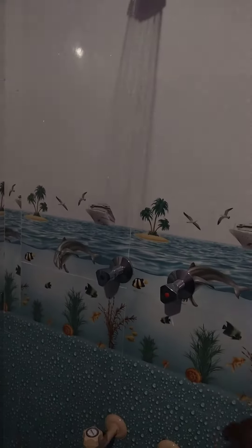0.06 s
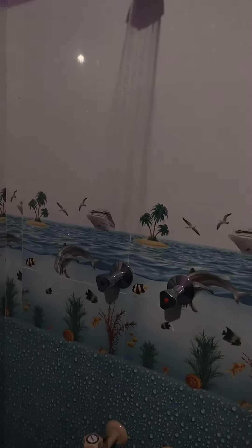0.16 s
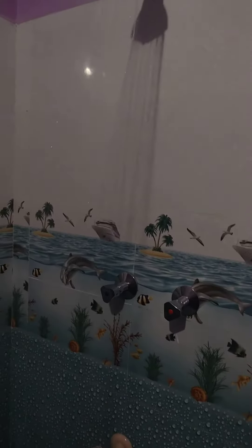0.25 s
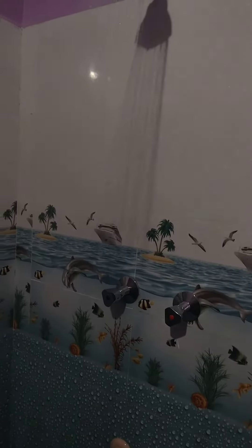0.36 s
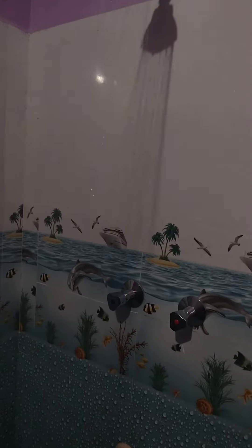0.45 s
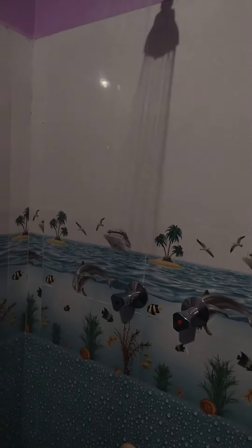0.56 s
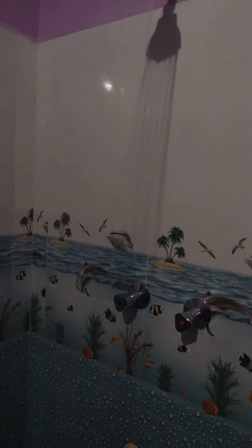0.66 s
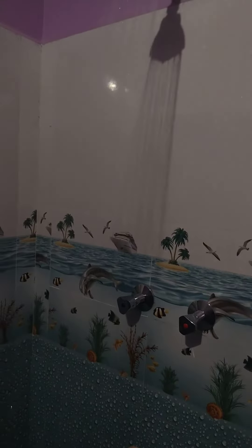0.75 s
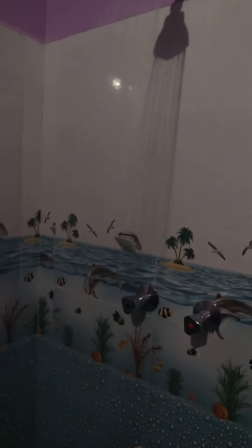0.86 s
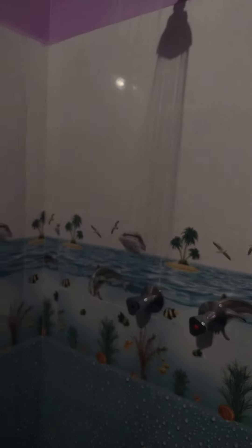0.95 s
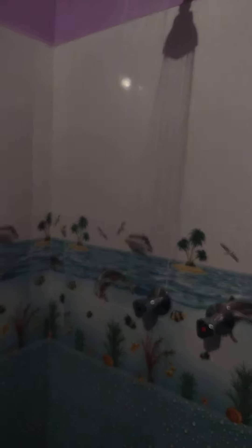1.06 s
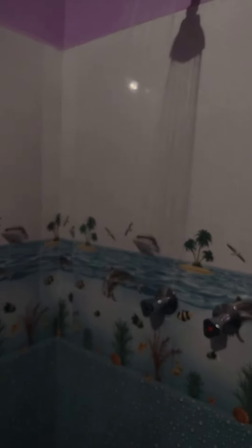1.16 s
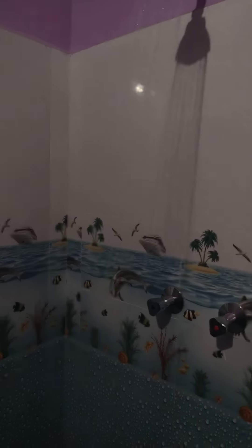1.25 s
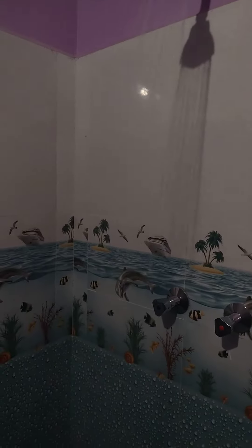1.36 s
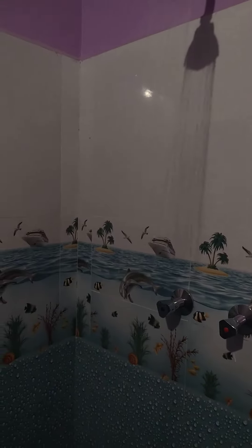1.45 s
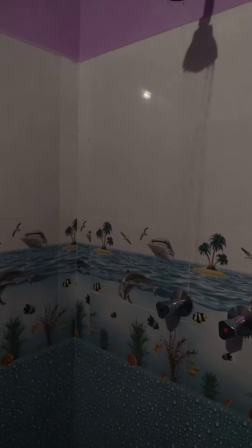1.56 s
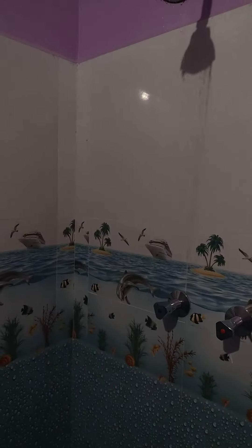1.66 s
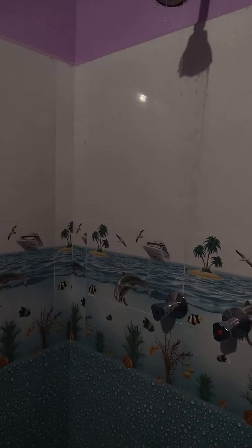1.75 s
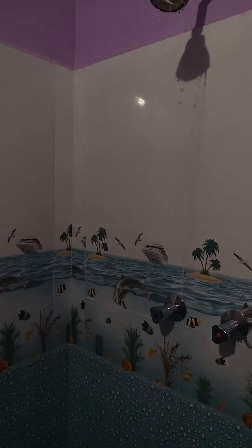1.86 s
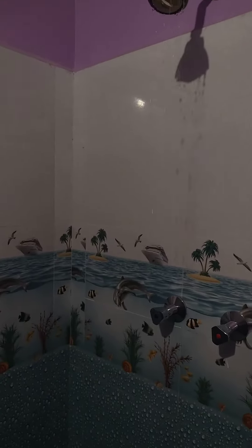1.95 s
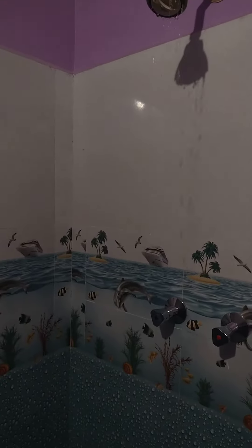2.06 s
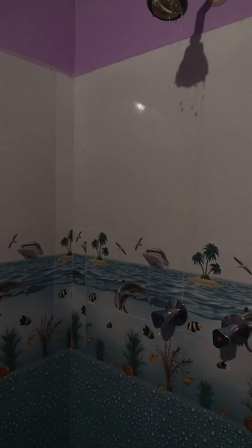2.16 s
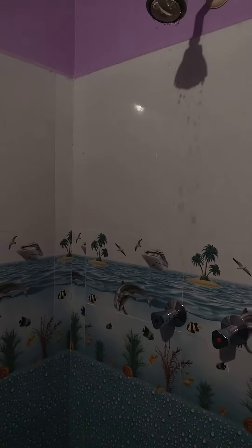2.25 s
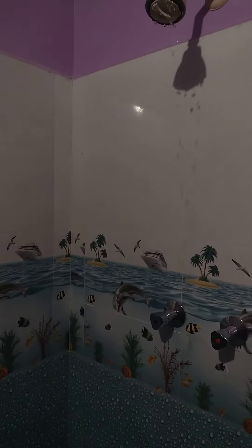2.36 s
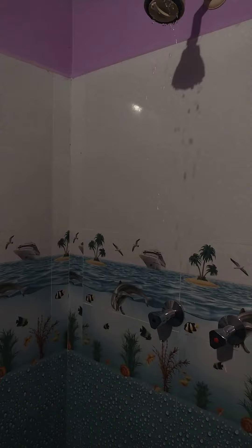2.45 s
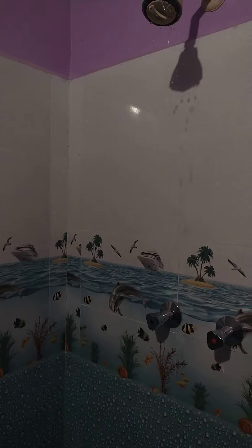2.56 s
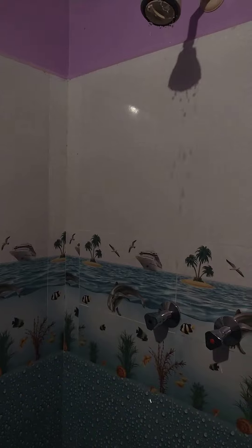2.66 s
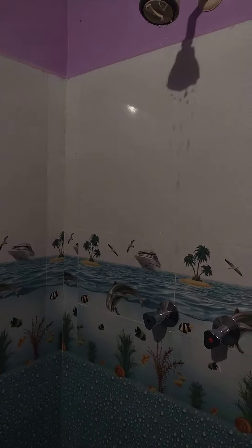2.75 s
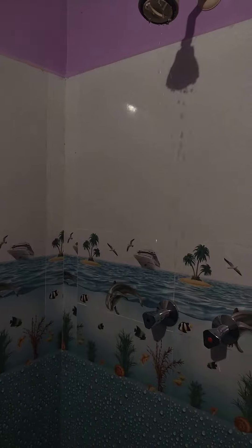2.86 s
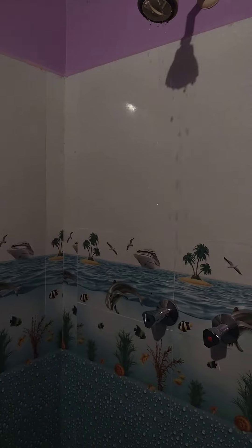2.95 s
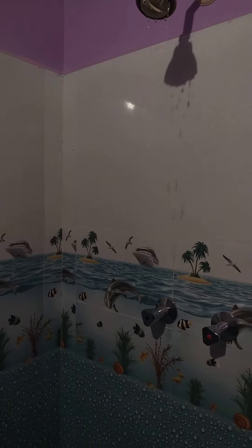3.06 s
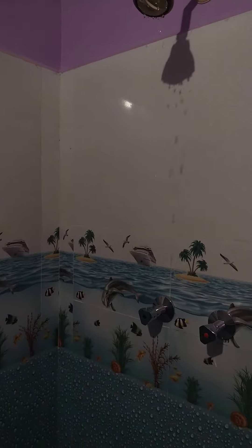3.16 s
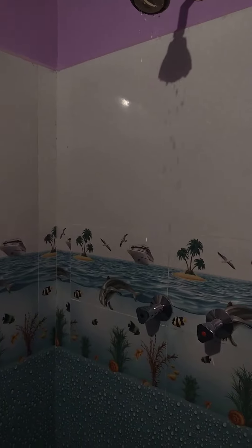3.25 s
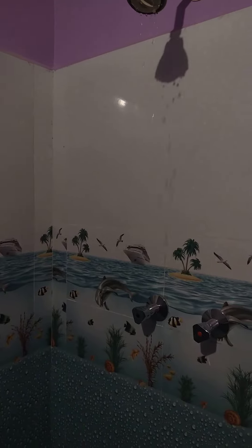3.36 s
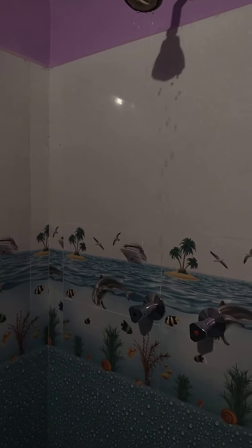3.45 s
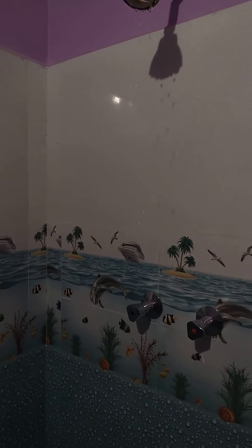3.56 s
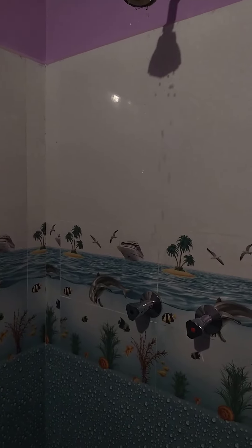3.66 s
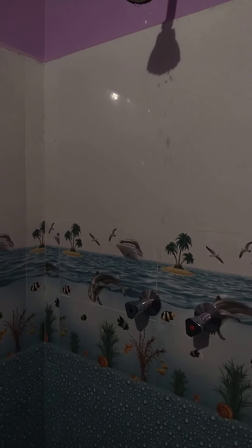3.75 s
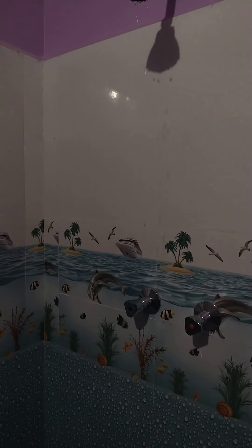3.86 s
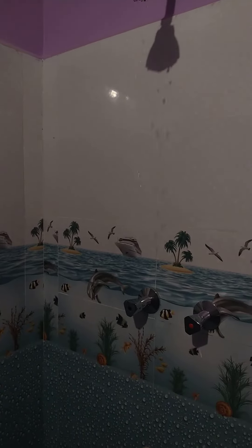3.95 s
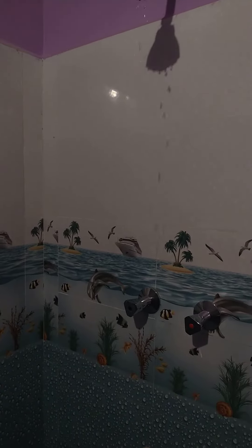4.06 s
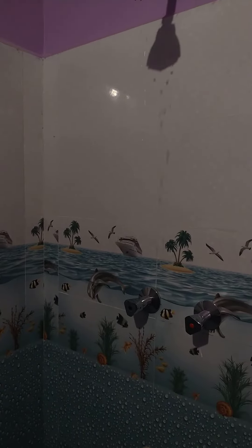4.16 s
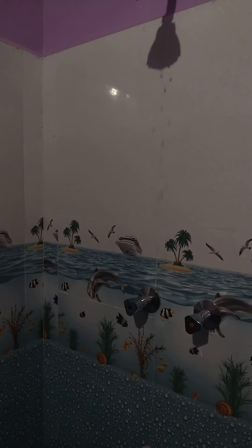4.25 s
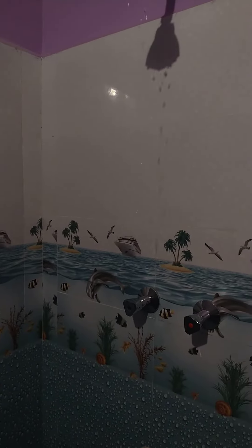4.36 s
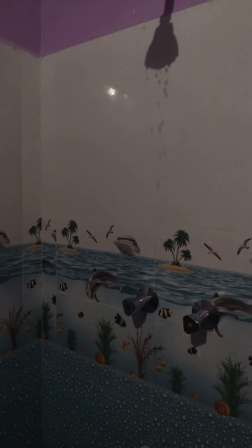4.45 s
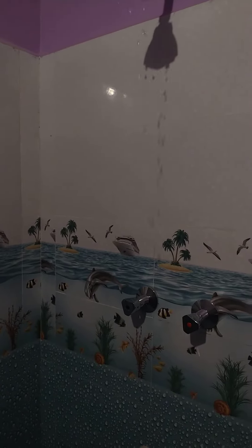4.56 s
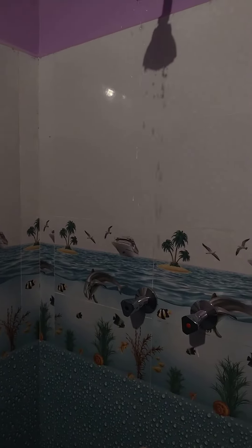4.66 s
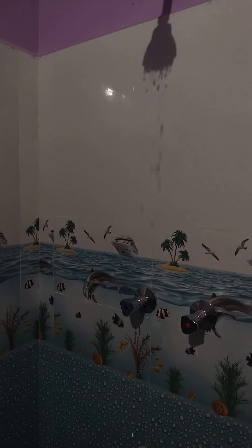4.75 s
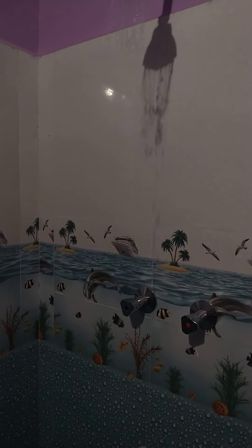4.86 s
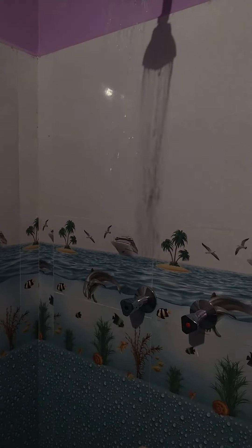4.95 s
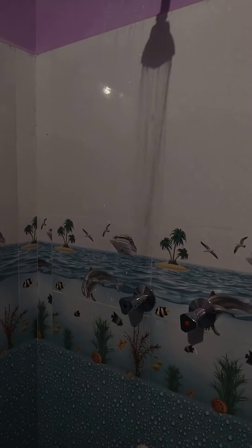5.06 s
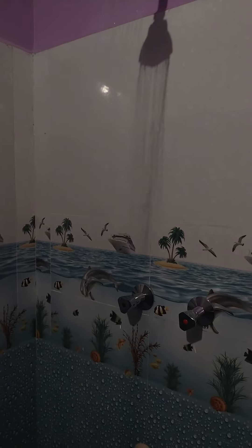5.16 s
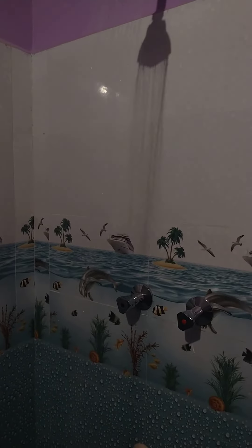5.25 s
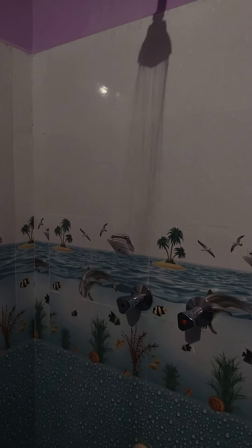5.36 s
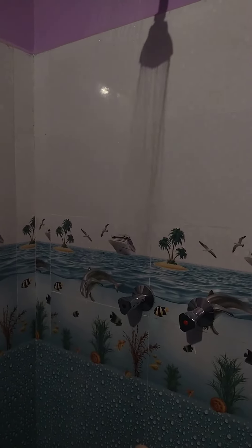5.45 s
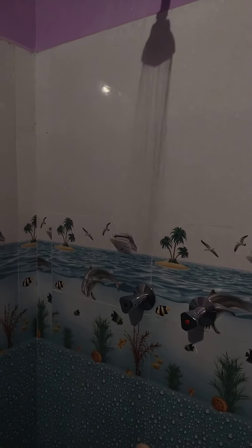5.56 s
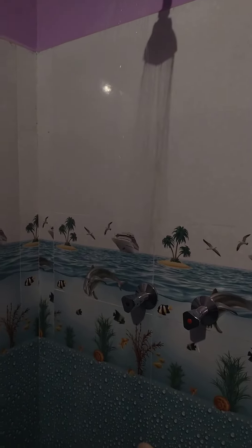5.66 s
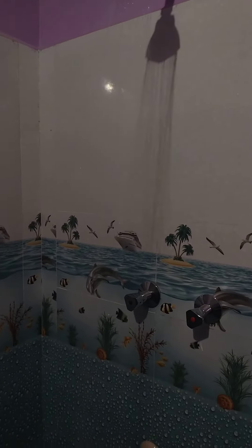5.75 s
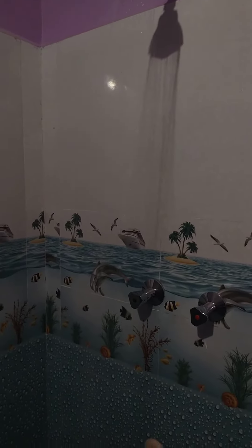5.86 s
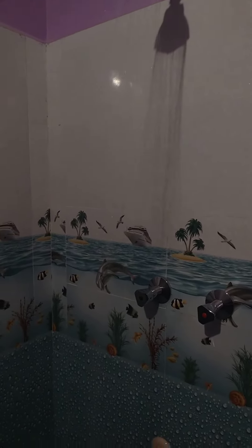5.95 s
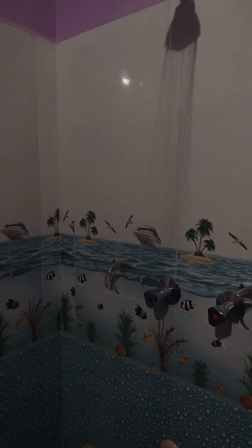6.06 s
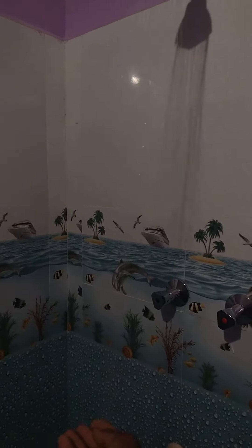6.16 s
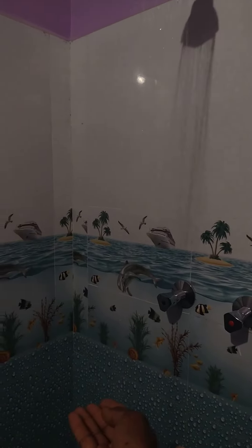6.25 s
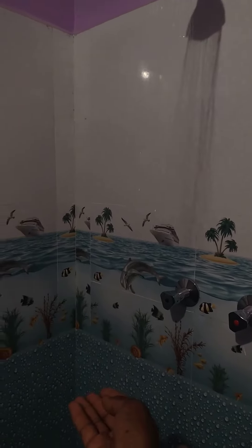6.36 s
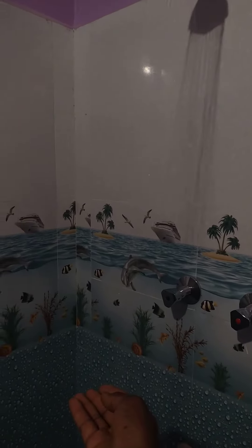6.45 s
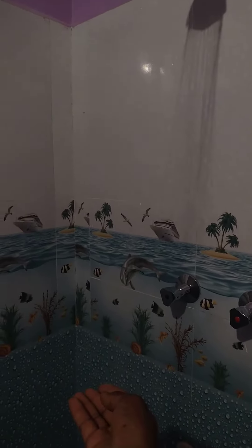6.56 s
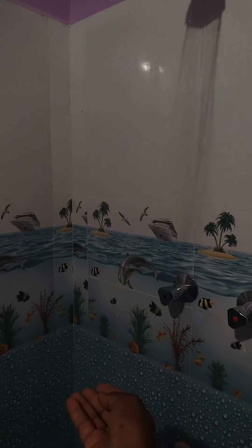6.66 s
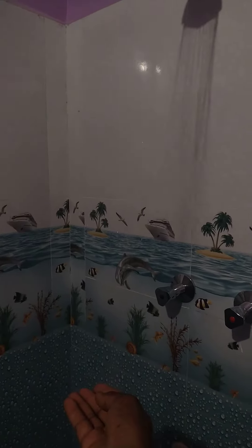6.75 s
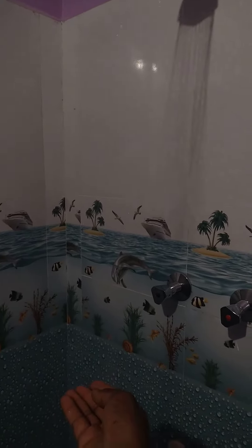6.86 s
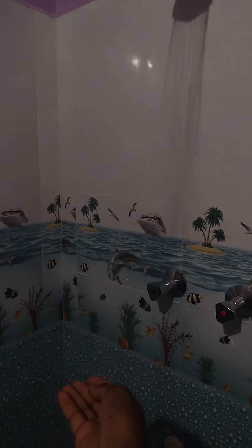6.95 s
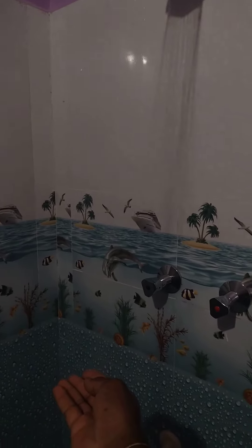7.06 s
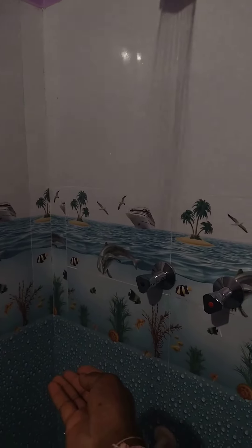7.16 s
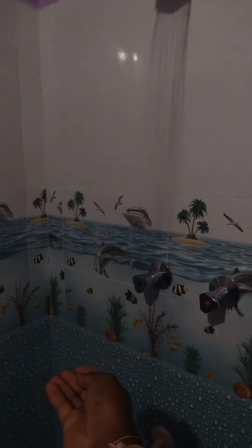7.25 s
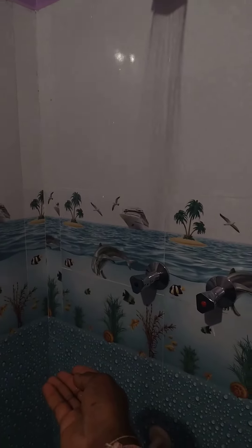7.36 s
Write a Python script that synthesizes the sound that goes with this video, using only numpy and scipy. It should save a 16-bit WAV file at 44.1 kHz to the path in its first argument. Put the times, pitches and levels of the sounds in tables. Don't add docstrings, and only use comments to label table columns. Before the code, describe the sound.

A bright shower hisses and spatters in a hard tiled bathroom, cuts off to scattered sharp splatting drops, then bursts back into steady spray.

```python
import sys
import numpy as np
from scipy import signal
from scipy.fft import rfft, irfft, next_fast_len
from scipy.io import wavfile
from scipy.ndimage import uniform_filter1d

SR = 44100
rng = np.random.default_rng(int(sys.argv[2]) if len(sys.argv) > 2 else 0)


def linear_from_db(decibels):
    return 10 ** (np.asarray(decibels, float) / 20)


def master_out(mix):
    frames = np.transpose(np.atleast_2d(mix))
    ceiling = np.clip(frames, -1, 1)
    pcm = np.round(ceiling * 32767).astype(np.int16)
    wavfile.write(sys.argv[1], SR, pcm)


N = 325899


def level(x, db):
    return x * linear_from_db(db) / np.sqrt(np.mean(x ** 2))


def colour(x, hz, db):
    size = next_fast_len(len(x))
    f = np.log(np.fft.rfftfreq(size, 1 / SR) + 1)
    gain = linear_from_db(np.interp(f, np.log(hz), db, left=-70))
    return irfft(rfft(x, size) * gain, size)[:len(x)]


def curve(table):
    s, *columns = np.transpose(table)
    return [np.interp(np.arange(N) / SR, s, c) for c in columns]


def walk(rate):
    k = int(SR / rate)
    held = np.repeat(rng.standard_normal(N // k + 1), k)
    return 1.5 * uniform_filter1d(held, k)[:N]


def band(x, hz, width):
    return signal.lfilter(*signal.iirpeak(hz, hz / width, SR), x)


# (time [s], fine spray level [dB], coarseness [dB])
FLOW = [(0, -28, 8.5), (0.14, -28.5, -0.5), (0.5, -33, -2), (1.27, -34.5, -0.5), (1.48, -33, -6),
        (1.93, -34.5, -1.5), (2.14, -55.5, 2), (2.4, -50.5, 4), (2.84, -44.5, 12), (3.3, -52, 7.5),
        (4.0, -51, 9.5), (4.2, -54.5, 16), (4.9, -53.5, 10), (5.3, -49, 9.5), (5.54, -29, -0.5),
        (5.75, -32.5, -3), (6.2, -34, -0.5), (7.39, -36, -1)]
MID_DB, LOW_DB = -17.5, -17.5
LOW_SHARE = 0.9


def spray(per_s=2500, scatter_db=4.0, clump_db=1.1, own_db=1.27):
    out, clumping = 0, walk(14)
    top_db, coarse_db = curve(FLOW)
    mid_db = top_db + MID_DB + coarse_db
    low_db = top_db + LOW_DB + LOW_SHARE * coarse_db
    shapes = [([5470, 8000, 10030, 17600], [-18.0, -3.0, -1.5, -7.5], top_db),
              ([4270, 5140, 7340, 9300], [-9, -0.5, -2.5, -12], mid_db),
              ([1480, 3240, 5300, 6060], [-30.5, -2.5, -1.5, -8], low_db)]
    for hz, shape_db, db in shapes:
        landed = rng.random(N) < per_s / SR
        size = linear_from_db(scatter_db * rng.uniform(-1.1, 1.3, size=N))
        hits = landed * rng.standard_normal(N) * size
        swell = linear_from_db(db + clump_db * clumping + own_db * walk(20))
        out = out + level(colour(hits, hz, shape_db), 0) * swell
    return out


def splats(table, early_s, splash_s, splash_db, gain_db, skirt_db=-22, bass_db_oct=1.5, treble_db_oct=1.5):
    out, t = np.zeros(N + 8192), np.arange(-256, 3840) / SR
    octaves = np.arange(-2.2, 1.1, .1)
    noise = rng.standard_normal((len(table), len(t))) * (t > 0) * np.exp(-np.abs(t) / splash_s)
    for (s, peak_db, bright, spread), splash in zip(table, noise):
        away = octaves - bright
        hump_db = -6 * (away / max(spread, .1)) ** 2
        thinning_db = np.abs(away) * np.where(away < 0, bass_db_oct, treble_db_oct)
        shape_db = np.maximum(hump_db, skirt_db - thinning_db)
        crack = t == 0
        splat = colour(crack + linear_from_db(splash_db) * splash, 8000 * 2 ** octaves, shape_db)
        k = max(int((s - early_s + t[0]) * SR), 0)
        out[k:k + len(t)] += splat * linear_from_db(peak_db + gain_db) / np.sqrt(np.sum(splat ** 2))
    return out[:N]


# (time [s], peak level [dB], brightness about the middle colour [octaves], spread [octaves])
DROPS = [(2.325, -31, .4, 0.86), (2.359, -23, 0.44, 0.48), (2.4416, -17, -0.24, 0.51),
         (2.489, -12.5, 0.51, 1), (2.6585, -13.5, -0.3, 0.53), (2.7454, -30, .2, .9),
         (2.7761, -12, 0.24, 0.82), (2.8739, -11, -0.14, 0.51), (2.9437, -16.5, 0.17, .5),
         (3.0685, -20.5, -.2, 0.88), (3.1832, -20, 0.25, 0.4), (3.2476, -23, 0.43, 0.89),
         (3.3577, -24, 0.13, 0.63), (3.4744, -31, 0.14, .5), (3.5386, -12, 0.12, 0.43),
         (3.6626, -16.5, -0.024, 1.05), (3.8563, -16.5, -0.029, 0.45), (3.9626, -16.5, 0.0033, .35),
         (3.9859, -12.5, -0.4, 0.55), (4.011, -15, 0.065, 0.49), (4.321, -25, 0.45, .6),
         (4.339, -9, -0.039, 0.37), (4.378, -7.5, -0.41, 0.56), (4.621, -27, 0.2, .8),
         (4.863, -30.5, -0.045, 0.25), (4.98, -31, 0.67, 0.54), (5.058, -29.5, 0.22, 0.45),
         (5.4483, -11.5, -0.099, 0.93), (5.625, -10.5, -0.095, 0.72)]
MAIN_ECHO_S = .0098


def fat_drops():
    return splats(DROPS, MAIN_ECHO_S, splash_s=0.0021, splash_db=-20, gain_db=6.5)


# (time [s], peak level [dB], brightness [octaves], spread [octaves])
CLUMPS = [(0.0584, -14, 0.65, 1), (0.267, -17, .45, 0.84), (0.449, -20, 0.63, 0.42),
          (0.559, -15, 0.78, 0.74), (0.6393, -17.5, 0.49, 0.75), (0.8001, -13, 0.27, 0.52),
          (0.9007, -19, 0.52, 0.75), (1.1072, -17.5, 0.52, 0.67), (1.2188, -21, 0.37, 0.64),
          (1.4556, -24.5, -0.24, 0.59), (1.6534, -21, 0.37, .7), (1.7984, -16.5, 0.59, 0.74),
          (2.042, -26, .5, 0.5), (5.1565, -24.5, 0.3, 0.46), (5.349, -12.5, 0.22, 0.85),
          (5.471, -17, -0.18, 0.61), (5.6593, -17, .33, 0.7), (5.7794, -22, 0.46, 0.56),
          (5.913, -14.5, 0.39, 0.53), (5.9944, -13, 0.35, 0.69), (6.188, -25, .35, .6),
          (6.331, -18.5, 0.12, 0.47), (6.429, -17.5, 0.17, 0.6), (6.532, -17, 0.47, .6),
          (6.6754, -20, 0.29, 0.4), (6.7684, -16.5, 0.26, 0.43), (6.8361, -15.5, 0.1, 0.51),
          (6.9052, -14.5, 0.38, 0.77), (7.0642, -21.5, 0.27, 0.36), (7.3518, -19, 0.37, .65)]


def spray_clumps():
    return splats(CLUMPS, .001, splash_s=0.012, splash_db=-7, gain_db=10.0)


# (time [s], peak level [dB], brightness [octaves], spread [octaves])
DRIBBLES = [(2.5, -25.5, 0.62, 0.58), (2.8, -27.5, -0.0095, .7), (3.085, -24, 0.38, .9),
            (3.6, -31.5, 0.12, 1.1), (3.69, -36, .4, 0.64), (3.97, -29, .7, 0.67),
            (4.025, -24.5, -0.18, 0.75), (4.33, -32, 0.87, 0.45), (4.385, -23, -0.26, 0.32),
            (5.17, -39, 0.11, 1.2), (5.55, -28, -0.46, 0.42)]


def dribbles():
    return splats(DRIBBLES, .001, splash_s=0.0073, splash_db=15, gain_db=17.5)


# (frequency [Hz], width [Hz], level [dB])
KNOCK = [(915, 260, 4), (1580, 150, 3), (2950, 220, -0.5), (3960, 430, 0.5)]
KNOCK_S, KNOCK_DB = 1.450, -34


def knock(rise_s=.006, fall_s=0.033):
    t = np.clip(np.arange(N) / SR - KNOCK_S, 0, None)
    scrape = rng.standard_normal(N) * (1 - np.exp(-t / rise_s)) * np.exp(-t / fall_s)
    ring = sum(linear_from_db(db) * band(band(scrape, hz, 2 * width), hz, width) for hz, width, db in KNOCK)
    return linear_from_db(KNOCK_DB) * ring


# (delay [ms], level [dB])
ECHOES = [(0, -7), (2, -6), (7.5, -9), (10.3, 0.5), (12.4, -2), (18.2, -6), (21.3, -9), (28.6, -5)]
# (frequency [Hz], time [s])
T60 = [(500, 0.59), (2000, 1), (4000, 0.74), (7000, 0.61), (11000, 0.63), (16000, 0.49)]


def room(tail_db=-25, build_s=0.0062, blur_s=0.00027):
    t = np.arange(SR) / SR
    f, s, z = signal.stft(rng.standard_normal(SR), SR, nperseg=128)
    t60 = np.interp(f, *np.transpose(T60))
    tail = signal.istft(z * linear_from_db(-60 * s / t60[:, None]), SR)[1][:SR]
    response = linear_from_db(tail_db) * tail * (1 - np.exp(-t / build_s))
    for ms, db in ECHOES:
        blur = rng.standard_normal(128) * np.exp(-t[:128] / blur_s)
        blur[0] = 1.54
        k = int(ms * SR / 1000)
        response[k:k + 128] += linear_from_db(db) * blur / np.sqrt(np.sum(blur ** 2))
    return response


def reflect(x, turn):
    before = SR // 2

    def ring(v):
        already_ringing = np.concatenate([v[before:0:-1], v])
        return signal.fftconvolve(already_ringing, room())[before:before + N]

    return ring(x * np.cos(turn)) + ring(x * np.sin(turn))


# (time [s], level [dB], held [s])
SURGES = [
    (0, -43, 0.3),
    (1.45, -41, 0.096),
    (2.47, -49.5, .02),
    (2.76, -54, 2.4),
    (5.32, -50.5, 0.04),
    (5.46, -48, 0.027),
    (6.01, -57, 0.025),
]


def surges(rise_s=0.01, fall_db_s=57.5):
    t = np.arange(N) / SR
    total = 0
    for s, db, held in SURGES:
        swell = np.clip((t - s) / rise_s + (s == 0), 0, 1)
        total = total + swell * linear_from_db(db - fall_db_s * np.clip(t - s - held, 0, None))
    return total


# (frequency [Hz], level [dB])
RUSH_COLOUR = [(250, -6.5), (500, -5), (900, -8), (1400, -5), (2000, -5.5), (3000, -6.5)]


def pipe_rush(rush_db=-52.5, follows=0.91, full_flow_db=-34.5):
    steady = linear_from_db(rush_db + follows * (curve(FLOW)[0] - full_flow_db))
    strength = np.hypot(steady, surges())
    rush = level(colour(rng.standard_normal(N), *np.transpose(RUSH_COLOUR)), 0)
    return rush * strength * linear_from_db(walk(6.8))


# (frequency [Hz], width [Hz], level [dB], loudest at [s], lasting [s])
PIPE_TONES = [(120.9, 1.9, -56, 2.86, 0.15), (305.6, 0.75, -61, 2.6, 0.63), (307, 19, -63.5, 0.89, 0.81),
              (218, 4.5, -58, 0.73, 0.28), (736, 3.1, -75.5, 2.5, 9.4), (567, 3.4, -65, 0.59, 0.39),
              (354, 4.8, -61.5, 7.3, 0.38)]


def pipe_tones():
    t = np.arange(N) / SR
    return sum(level(band(rng.standard_normal(N), hz, width), db) * np.exp(-((t - s) / lasting) ** 2)
               for hz, width, db, s, lasting in PIPE_TONES)


# (frequency [Hz], level [dB])
HUM = [(15, -8), (80, 4), (110, 7.5), (200, 7), (310, 3.5), (600, -1), (2200, -12), (15000, -34)]


def hum():
    return level(colour(rng.standard_normal(N), *np.transpose(HUM)), -56)


# (frequency [Hz], level [dB])
STRAY = [(300, -16), (900, -7), (1500, -3), (2450, -2), (3500, 1), (4900, -5), (7000, -3.5)]


def stray():
    return level(colour(rng.standard_normal(N), *np.transpose(STRAY)), -61)


def scene(drift_hz=0.898):
    mist = [spray() / np.sqrt(2 * np.sum(room() ** 2)) for _ in range(2)]
    turn = np.pi / 4 * (1 + np.sin(2 * np.pi * drift_hz * np.arange(N) / SR))
    under_head = reflect(mist[0] + fat_drops(), turn)
    further_out = reflect(mist[1] + spray_clumps() + dribbles() + knock(), turn)
    mid = under_head + further_out + pipe_rush() + hum() + pipe_tones()
    side = stray()
    return np.array([mid + side, mid - side])


def top_cut(x):
    return signal.sosfilt(signal.butter(12, 16060, fs=SR, output="sos"), x)


# (frequency [Hz], left share [ratio], left lag [us], right share [ratio], right lag [us],
# right over left [dB], right channel lag [us])
WIDEN = [(200, 1.11, 418.0, 1.12, 414.9, 4.1, -2.1), (1200, 0.74, 376.8, 0.77, 443.4, 0.7, 12.3),
         (2450, 1.01, 404.8, 0.84, 414.0, 0.0, -10.5), (4900, 0.7, 394.1, 0.78, 418.7, 3.0, -9.8),
         (7350, 0.71, 389.0, 0.75, 423.7, 4.6, -13.0), (9800, 1.36, 390.5, 0.46, 429.4, 6.7, -8.9),
         (12250, 2.1, 395.0, 0.24, 420.6, 9.8, -9.7), (15000, 3.28, 404.0, 0.11, 399.4, 15.1, 4.5)]


def record(dry):
    size = next_fast_len(N + 64)
    f = np.fft.rfftfreq(size, 1 / SR)
    hz, *columns = np.transpose(WIDEN)
    left, left_us, right, right_us, right_db, lag_us = (np.interp(f, hz, c) for c in columns)

    def late(us):
        return np.exp(-2j * np.pi * f * us / 10 ** 6)

    mid = rfft(dry[0] + dry[1], size) / 2
    side = rfft(dry[0] - dry[1], size) / 2
    pair = [mid * (1 - left * late(left_us)) / linear_from_db(right_db) + side,
            mid * (1 - right * late(right_us)) * late(lag_us) - side]
    top_hz = 15750
    wide = irfft(np.array(pair) * (f < top_hz), size)[:, :N]
    return top_cut(wide)


dry = scene()
out = record(dry)
master_out(out)
```